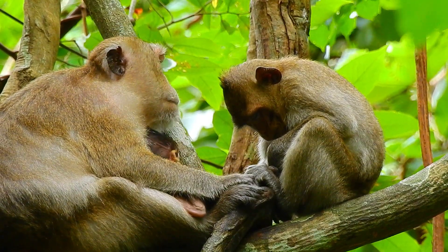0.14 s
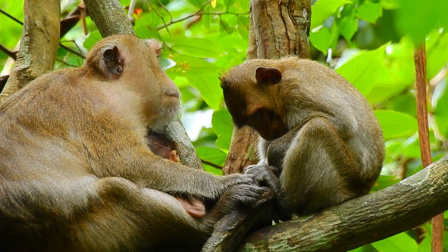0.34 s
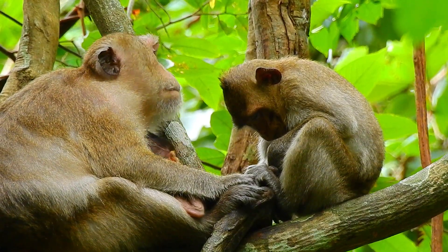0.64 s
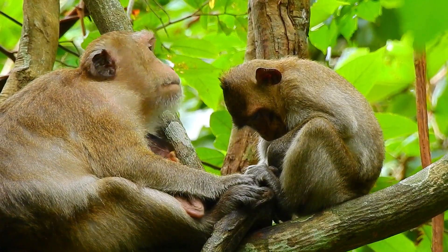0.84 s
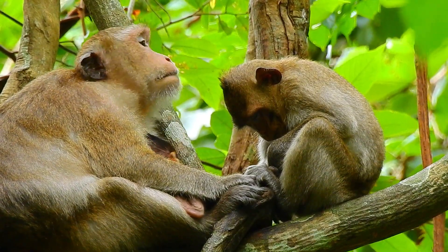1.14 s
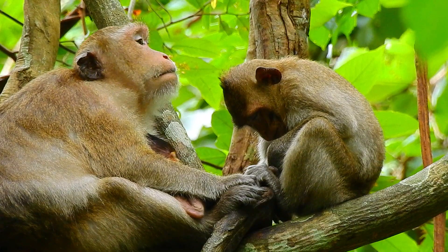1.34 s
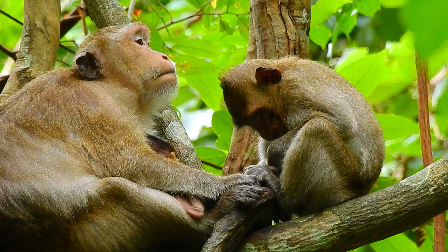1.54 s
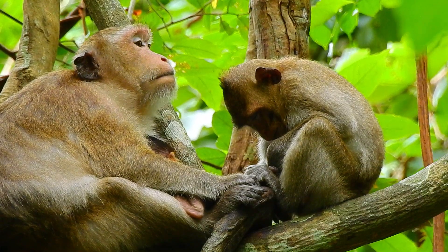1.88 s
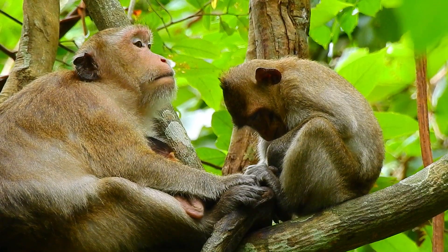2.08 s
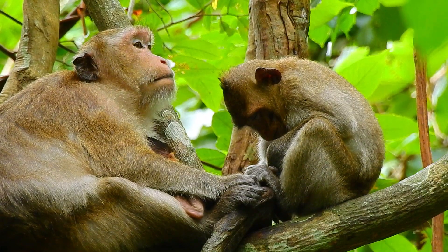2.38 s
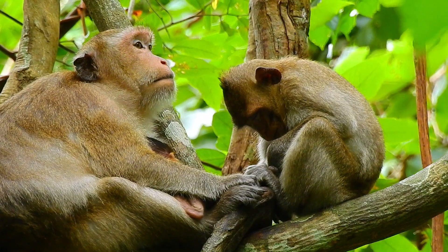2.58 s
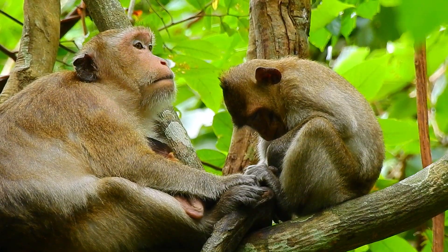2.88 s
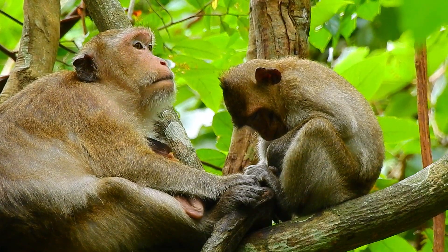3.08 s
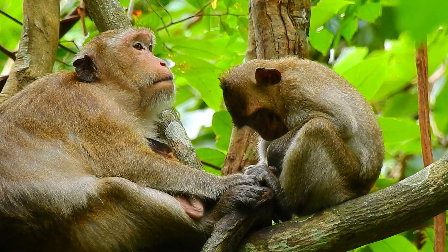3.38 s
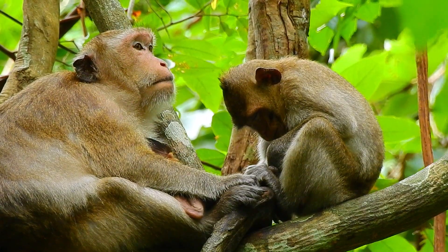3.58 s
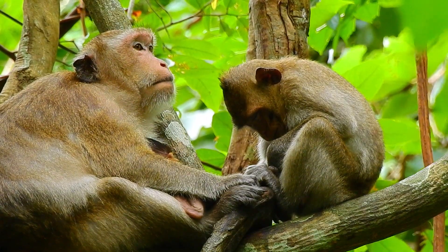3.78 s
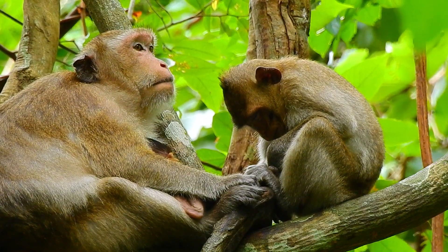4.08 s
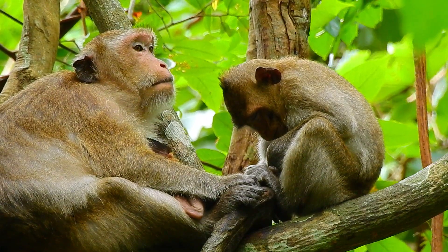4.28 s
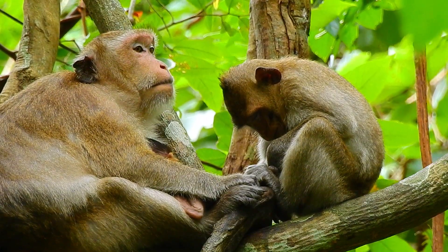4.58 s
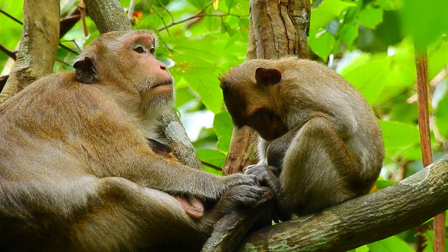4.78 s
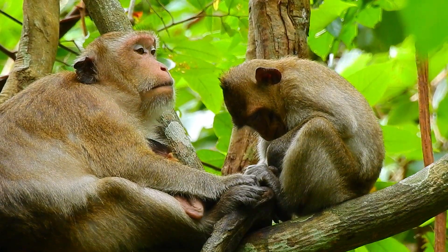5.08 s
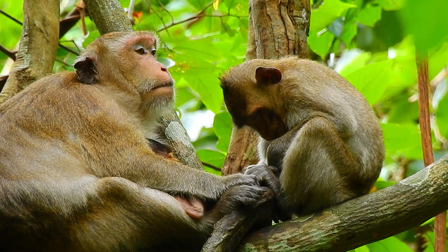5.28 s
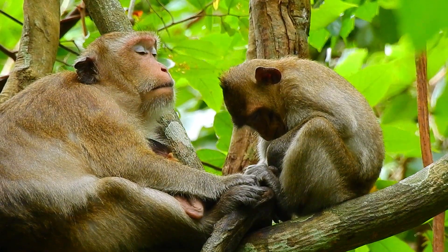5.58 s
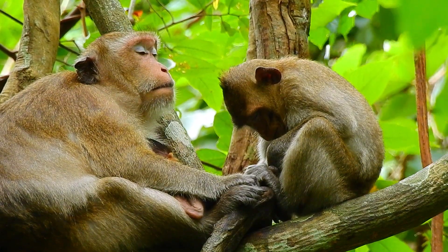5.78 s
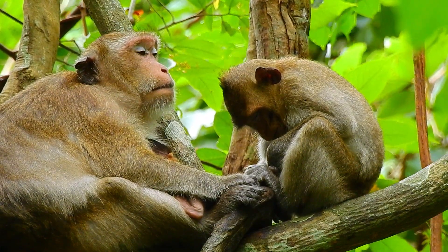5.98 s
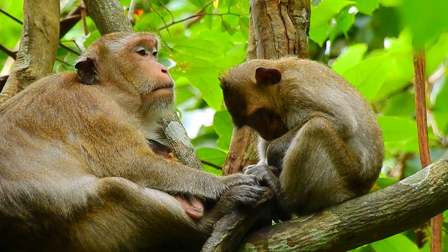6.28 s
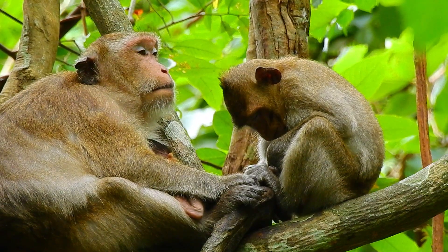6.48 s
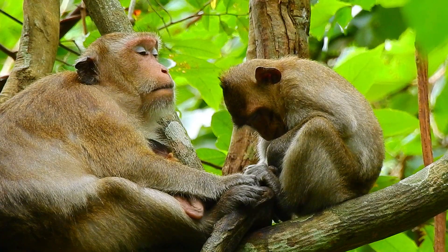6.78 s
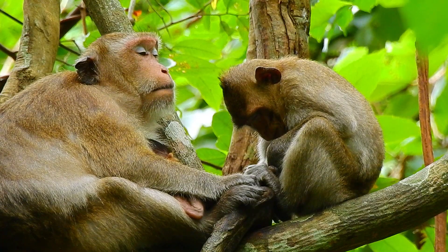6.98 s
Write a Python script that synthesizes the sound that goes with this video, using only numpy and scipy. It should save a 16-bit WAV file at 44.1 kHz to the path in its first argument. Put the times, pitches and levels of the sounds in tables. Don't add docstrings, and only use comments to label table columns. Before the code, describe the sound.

Forest edge by day, heard through an open stereo pair. Throughout, a thin steady insect drone near 5 kHz, cricket tone, soft canopy hiss and deep distant traffic rumble. From 0.1 to 0.6 s a near bird gives faint short upward whistles; from 0.8 to 2.2 s distant birds add glides and trilled falling notes, echoing among trunks. A cicada buzz swells from 1.5 s, is full by 2.2 and drops around 3.6. A quick near double note at 2.3, sharp chips at 2.5 and 2.8, and little dry leaf ticks follow. Around 3.3-3.8 s rapid glides twist up and down. From 4.1 to 5.4 s comes the loudest phrase: clear, mellow arched whistles around 1.1-2 kHz, with far replies, leaf rustle and two crisp ticks near 4.6. A few low notes fall at 5.6; then faint distant chirps, gently wavering insects and a weakening cricket until 7.1 s.

```python
import sys
import numpy as np
from scipy import signal
from scipy.fft import rfft, irfft, next_fast_len
from scipy.io import wavfile
from scipy.ndimage import uniform_filter1d

SR = 44100
rng = np.random.default_rng(int(sys.argv[2]) if len(sys.argv) > 2 else 0)


def invert_db(level):
    return 10 ** (np.asarray(level, dtype=float) / 20)


def generate_wav(sig):
    pcm = np.round(np.clip(np.atleast_2d(sig).T, -1, 1) * 32767).astype(np.int16)
    wavfile.write(sys.argv[1], SR, pcm)


N = 314874


def in_time(rows):
    s, *columns = np.transpose(rows)
    return [np.interp(np.arange(N) / SR, s, c) for c in columns]


def at_hz(points, hz):
    point_hz, value = np.transpose(points)
    return np.interp(np.log(hz), np.log(point_hz), value)


def drift(rate):
    r = np.exp(-80 * np.pi * rate / SR)
    slow = signal.lfilter([1], [1, -2 * r, r * r], rng.standard_normal(N // 40 + 2002))[2000:]
    return np.interp(np.arange(N) / 40, np.arange(len(slow)), slow / slow.std())


def stereo(mid, side, alike):
    c = np.clip(alike, 0, 1)
    return np.sqrt(1 + c) * mid + np.sqrt(1 - c) * side * [[1], [-1]]


def coloured(gain, alike, source=None):
    size = next_fast_len(N)
    hz = np.maximum(np.arange(size // 2 + 1) * SR / size, 1)
    pulsing = 1 if source is None else source
    mid, side = rfft(rng.standard_normal((2, N)) * pulsing, size)
    x = irfft(gain(hz) * stereo(mid, side, alike(hz)), size)[:, :N]
    return x / x.std()


def resonant(centre_hz, width_hz, alike, source=None):
    return coloured(lambda hz: 1 / (1 + (2 * (hz - centre_hz) / width_hz) ** 2),
                    lambda hz: alike + 0 * hz, source)


# (frequency [Hz], likeness [0-1])
OPEN_LIKENESS = [(30, 1), (150, 0.98), (300, 0.57), (1000, 0.22), (3000, 0.53), (6000, 0.21), (9000, 0.018),
                 (13000, 0.15)]


def open_likeness(hz):
    return at_hz(OPEN_LIKENESS, hz)


# (frequency [Hz], density [dB per Hz])
TRAFFIC_SPECTRUM = [(12, -54), (20, -38.5), (60, -1), (88, 1.5), (141, -3), (196, -12), (255, -23.5),
                    (400, -33), (520, -51), (880, -120)]
# (time [s], level [dB])
TRAFFIC_LEVEL = [(0, -35.5), (5.6, -36), (7.14, -36.5)]


def traffic():
    level_db, = in_time(TRAFFIC_LEVEL)
    rumble = coloured(lambda hz: invert_db(at_hz(TRAFFIC_SPECTRUM, hz)), open_likeness)
    return invert_db(level_db) * rumble * invert_db([[.2], [-.2]])


# (frequency [Hz], density [dB per Hz])
CANOPY_SPECTRUM = [(180, -33), (300, -8.5), (620, -7.5), (808, -11), (907, -11.5), (1870, -12.5),
                   (2790, -11), (3570, -14.5), (4420, -12), (4880, -2), (5390, -9), (8420, -16),
                   (9930, -22), (11100, -21.5), (15500, -32)]


def canopy():
    hiss = coloured(lambda hz: invert_db(at_hz(CANOPY_SPECTRUM, hz)), open_likeness)
    return invert_db(-48 + 0.6 * drift(18)) * hiss


def leaf_noise(out, s, shape, hz, width):
    band = signal.butter(3, [hz - width / 2, hz + width / 2], "band", fs=SR, output="sos")
    noise = rng.standard_normal((2, len(shape)))
    mid, side = signal.sosfilt(band, noise) * np.sqrt(SR / 4 / width)
    a = round(s * SR)
    out[:, a:a + len(shape)] += (shape * (mid + 0.67 * side * [[1], [-1]]))[:, :N - a]


# (time [s], peak level [dB], centre [Hz], width [Hz], fall by 60 dB [s])
TICKS = [
    (2.428, -42, 7000, 2970, 0.042),
    (2.739, -40, 6440, 2510, 0.025),
    (3.12, -39, 6870, 3010, 0.033),
    (3.461, -43, 6500, 2470, 0.04),
    (4.534, -33.5, 6540, 2480, 0.028),
    (4.711, -34, 6080, 2000, .025),
    (6.605, -51, 12300, 2530, 0.071),
]


def leaf_ticks():
    out, t = np.zeros((2, N)), np.arange(SR // 2) / SR
    for s, db, hz, width, t60 in TICKS:
        shape = invert_db(db + 4.5 - 60 * t / t60) * np.minimum(t / 0.0038, 1)
        leaf_noise(out, s, shape, hz, width)
    return out


# (time [s], length [s], centre [Hz], width [Hz], level [dB])
RUSTLES = [
    (3.971, 0.23, 6380, 1730, -43.5),
    (4.217, 0.39, 4400, 1550, -46.5),
    (4.295, 0.14, 2920, 500, -50),
    (4.294, 0.087, 10000, 906, -52.5),
    (4.524, 0.16, 9880, 890, -54),
    (5.356, 0.14, 10520, 1440, -64),
    (6.142, 0.095, 7120, 1557, -56),
]


def leaf_rustles():
    out, t, grains = np.zeros((2, N)), np.arange(SR // 2) / SR, drift(60)
    for s, length, hz, width, db in RUSTLES:
        clumps_db = 1.27 * grains[round(s * SR):][:len(t)]
        swell = 3 * t / length * np.exp(-3 * t / length)
        leaf_noise(out, s, invert_db(db + 9.0 + clumps_db) * swell, hz, width)
    return out


# (frequency [Hz], width [Hz], level [dB], likeness [0-1])
DRONES = [
    (4839, 135, -51.5, 0.65),
    (804, 103, -63.5, 0.94),
    (997, 46, -64.5, 0.93),
    (4048, 71, -65.5, 0.18),
    (10860, 110, -71, 0.11),
]


def drones():
    return sum(invert_db(db + 2.5 * drift(3.5)) * resonant(hz, width, alike) for hz, width, db, alike in DRONES)


# (multiple of its tone, width [Hz], level [dB], waver [dB], share of the tiring)
CRICKET = [
    (1, 50, -56, -0.8, 0.64),
    (2, 19, -57.5, 2.8, 0.18),
    (4, 76, -67.5, -0.5, 1.3),
]


def cricket():
    t = np.arange(N) / SR
    tired_db = 8.5 * np.maximum(t - 5.15, 0)
    out = 0
    for multiple, width, db, waver_db, share in CRICKET:
        level = invert_db(db + waver_db * drift(0.75) - share * tired_db)
        out = out + level * resonant(multiple * 2864, width, 0.33)
    return out


# (frequency [Hz], width [Hz], start [s], stop [s], level [dB])
KATYDIDS = [
    (7650, 70, 1.4, 4.7, -63),
    (8250, 363, 4, 7.3, -60),
]


def katydids():
    t = np.arange(N) / SR
    swell_db_per_s, fade_db_per_s, resting_db = 15, 44, -16
    out = 0
    for hz, width, start, stop, db in KATYDIDS:
        bout_db = np.minimum(swell_db_per_s * (t - start), fade_db_per_s * (stop - t))
        out = out + invert_db(db + np.clip(bout_db, resting_db, 0)) * resonant(hz, width, 0.25)
    return out


# (time [s], level [dB])
CICADA = [
    (0, -68),
    (1.45, -52.5),
    (1.52, -47),
    (2.15, -42.5),
    (3.47, -43.5),
    (3.7, -57.5),
    (5.3, -51.5),
    (5.85, -60),
    (6.6, -53.5),
    (7.14, -62),
]


def cicada():
    effort_db, = in_time(CICADA)
    line_db = effort_db - 9 + 0.6 * (effort_db - effort_db.max())
    beat_hz = 117 * (1 + 0.022 * drift(1.2))
    beat = np.sin(2 * np.pi * np.cumsum(beat_hz) / SR)
    buzz = invert_db(effort_db + 1.5) * resonant(5103, 640, 0.43, source=1 + 0.13 * beat)
    return buzz + invert_db(line_db) * resonant(5380, 44, 0.56)


def bird(notes, edge_s, waver_db, half_db=-90, trill_hz=0, trill_rate=0):
    pitch, gain = np.zeros(N), np.zeros(N)
    for s, length, start, middle, end, db in notes:
        a, b = round(s * SR), round((s + length) * SR)
        u = np.linspace(-1, 1, b - a)
        bend = (start + end) / 2 - middle
        pitch[a:b] = middle + (end - start) / 2 * u + bend * u ** 2
        gain[a:b] = invert_db(db) * np.sqrt(2)
    on = np.flatnonzero(pitch)
    pitch = np.interp(np.arange(N), on, pitch[on])
    pitch = pitch + trill_hz * np.sin(2 * np.pi * trill_rate * np.arange(N) / SR)
    edge = max(int(edge_s * SR), 1)
    gain = uniform_filter1d(uniform_filter1d(gain, edge), edge) * invert_db(waver_db * drift(68))
    phase = 2 * np.pi * np.cumsum(uniform_filter1d(pitch, edge)) / SR
    return gain * (np.sin(phase) + invert_db(half_db) * np.sin(phase / 2))


def glides(rows):
    return [(s, length, start, start + 0.63 * (end - start), end, db) for s, length, start, end, db in rows]


def among_trunks(x, echo_db, pan_db, build_s, alike):
    t = np.arange(int(1.2 * SR)) / SR
    mid, side = rng.standard_normal((2, 2, 1, len(t)))
    deep_wood = invert_db(-60 * t / 1.43)
    near_trunks = invert_db(6 - 60 * t / 0.45)
    scatter = stereo(mid, side, alike) * (deep_wood + near_trunks) * (1 - np.exp(-t / build_s))
    scatter = scatter / np.sqrt(np.sum(scatter ** 2) / 4)
    scatter = signal.sosfilt(signal.butter(2, 1750, "high", fs=SR, output="sos"), scatter)
    turn = 2 * np.pi * (0.8144 * np.arange(N) / SR + 0.13 * drift(4.4))
    sent = x * np.array([[np.cos(turn)], [np.sin(turn)]])
    wet = signal.fftconvolve(sent, scatter, axes=2).sum(axis=0)[:, :N]
    return (x + invert_db(echo_db) * wet) * invert_db(pan_db / 2 * np.array([[1], [-1]]))


# (time [s], length [s], start [Hz], end [Hz], level [dB])
TRILLS = [
    (.89, .079, 2550, 2290, -50.5),
    (1.43, .2, 2600, 2243, -54),
    (1.77, .036, 3150, 3594, -56.5),
    (1.965, .067, 2470, 2387, -44),
    (2.035, .19, 2450, 2130, -41.5),
    (4.21, .08, 2520, 2190, -46),
    (5.68, .1, 2280, 2660, -60),
    (6.04, .088, 2250, 2740, -57.5),
    (6.14, .073, 3050, 1950, -55.5),
]


def trilling_bird():
    return bird(glides(TRILLS), 0.00044, 0.5, trill_hz=222, trill_rate=32)


# (time [s], length [s], start [Hz], end [Hz], level [dB])
ASIDE = [
    (1.025, .18, 2482, 2476, -48.5),
    (1.458, 0.14, 1959, 1897, -40.5),
    (4.015, 0.029, 2075, 2089, -41),
    (4.478, .016, 2180, 2134, -46),
    (4.53, 0.048, 2155, 2055, -38.5),
    (4.77, .02, 2050, 2046, -49),
    (6.06, 0.092, 2182, 2450, -56.5),
    (6.5, .14, 2300, 2200, -66),
    (6.94, .06, 2700, 2700, -65),
]


def aside_notes():
    return bird(glides(ASIDE), 0.0024, 1.9)


# (time [s], valley of the second partial [Hz], level [dB], valley length [s], flick [dB])
CHIPS = [
    (2.5, 3060, -48, 0.022, 3.5),
    (2.79, 3070, -42.5, 0.028, -15),
]


def chipping_bird():
    drop_s, flick_s, flick = 0.01325, 0.018, 1.16
    notes = []
    for s, hz, db, valley, flick_db in CHIPS:
        bottom = s + drop_s
        notes += glides([(s, drop_s, 1.22 * hz, hz, db + 2.5),
                         (bottom, valley, .98 * hz, 1.02 * hz, db)])
        notes += [(bottom + valley, flick_s, 1.02 * hz, (1.02 + flick) / 2 * hz, flick * hz, db + flick_db)]
    return bird(notes, 0.0033, 2.6, half_db=-12.5)


# (time [s], length [s], pitch [Hz], level
# [dB])
HELD = [(1.154, 0.025, 3102, -62.5), (3.85, 0.055, 2045, -45), (3.948, 0.015, 2024, -37.5),
        (3.979, 0.014, 2075, -38.5), (4.033, 0.038, 2646, -44.5), (4.11, .1, 2660, -53),
        (4.433, .036, 3207, -42.5), (4.816, 0.031, 3021, -32), (5.564, 0.0296, 965, -44.5),
        (5.605, .045, 888, -52), (6.039, 0.042, 1980, -55), (6.28, .05, 2720, -71), (6.504, .04, 2553, -60),
        (6.561, .025, 2550, -56), (6.612, .03, 2510, -60.5)]
# (time [s], length [s], start [Hz], end [Hz], level
# [dB])
FAR_GLIDES = [(.808, 0.053, 3220, 2930, -54), (.853, 0.08, 2785, 2663, -47),
              (1.745, 0.023, 2923, 2674, -45), (1.775, 0.045, 2703, 2900, -45.5),
              (3.05, 0.02, 3060, 2900, -43), (3.072, .017, 2990, 3333, -48),
              (3.09, 0.039, 3040, 2880, -46.5), (3.49, 0.137, 2065, 2267, -44),
              (4.462, 0.019, 3140, 2830, -39.5), (4.84, 0.02, 2900, 2548, -39),
              (5.52, 0.0336, 824, 940, -51), (5.9, .125, 2072, 2180, -59.5), (6.235, .04, 3326, 2700, -59),
              (.985, .035, 2438, 2470, -47), (6.36, 0.05, 2497, 2395, -59)]


def far_whistlers():
    held = [(s, length, hz, hz, hz, db) for s, length, hz, db in HELD]
    return bird(held + glides(FAR_GLIDES), 0.003, 4.8)


def far_birds():
    song = far_whistlers() + chipping_bird() + aside_notes() + trilling_bird()
    return among_trunks(song, echo_db=5.0, pan_db=1.5, build_s=0.00084, alike=0.79)


def arches(rows, climb_hz_per_s, hold_s, hold_per_fall, floor_hz, rise_db, fall_db, round_hz_per_s=0):
    notes = []
    for s, crest, db, rise, fall in rows:
        up, down = crest * (1 - .06), crest * (1 - .035)
        hold = hold_s + hold_per_fall * fall
        climb = climb_hz_per_s * rise
        halfway = (down + floor_hz) / 2 - round_hz_per_s * max(fall - .025, 0)
        notes += [(s - rise, rise, up - climb, up - climb / 2, up, db + rise_db),
                  (s, hold, up, crest, down, db),
                  (s + hold, fall, down, halfway, floor_hz, db + fall_db)]
    return notes


# (crest time [s], crest [Hz], level [dB], rise [s], fall [s])
CRESTS = [
    (4.645, 1904, -32.5, 0.014, 0.0226),
    (4.897, 1960, -32, .024, 0.017),
]
SLURS = [
    (.442, 1930, -45.5, 0.017, 0),
    (.582, 1924, -43.5, .026, 0.0015),
]
DIVES = [
    (4.517, 2019, -34.5, .03, .044),
    (5.135, 1988, -31, .02, 0.027),
    (5.348, 1822, -30, .028, .019),
]
CLIMBS = [
    (.122, 1607, -48.5, 0.048, 0.0053),
    (4.096, 1600, -28, 0.024, 0.017),
    (4.288, 1552, -28.5, .048, .05),
]
# (time [s], length [s], start [Hz], end [Hz], level [dB])
NEAR_GLIDES = [(1.318, 0.047, 1286, 1140, -46.5), (1.425, .016, 1786, 1735, -49),
               (1.52, 0.032, 1150, 1323, -53), (1.575, 0.01, 1510, 1470, -41),
               (1.745, 0.036, 1500, 1420, -54), (2.326, 0.0155, 1707, 1158, -37.5),
               (2.343, 0.032, 1170, 1110, -37.5), (2.505, 0.019, 1696, 1500, -46),
               (2.525, 0.03, 1548, 1843, -49), (3.052, .03, 1541, 1480, -53.5),
               (3.315, 0.029, 2140, 1850, -47.5), (3.39, .014, 1904, 1650, -42),
               (3.41, 0.019, 1950, 2080, -38.5), (3.432, .011, 2310, 2570, -40),
               (3.443, .011, 2650, 3380, -48), (3.455, .032, 3390, 2860, -37.5),
               (3.58, .042, 2050, 1730, -43.5), (3.626, .052, 1738, 1975, -44.5),
               (3.69, 0.024, 2570, 2436, -35.5), (3.72, .035, 2420, 2086, -39.5),
               (3.755, .028, 2185, 2530, -43), (4.597, 0.024, 1017, 1435, -46),
               (5.622, 0.0224, 1624, 1830, -47), (5.648, 0.016, 1460, 1197, -45)]


def near_whistler():
    song = arches(CRESTS, climb_hz_per_s=18000, hold_s=0.027, hold_per_fall=0.013, floor_hz=1310,
                  rise_db=-5, fall_db=-7.5)
    song += arches(SLURS, climb_hz_per_s=25000, hold_s=.03, hold_per_fall=0, floor_hz=0,
                   rise_db=-6, fall_db=0)
    song += arches(DIVES, climb_hz_per_s=15000, hold_s=0.000966, hold_per_fall=0.64, floor_hz=1088.5,
                   rise_db=-8, fall_db=-2.7, round_hz_per_s=7590)
    song += arches(CLIMBS, climb_hz_per_s=4500, hold_s=0.00856, hold_per_fall=0.085, floor_hz=1130,
                   rise_db=-8.5, fall_db=-4.2)
    voice = bird(song + glides(NEAR_GLIDES), 0.0057, 0.28)
    return among_trunks(voice, echo_db=3.5, pan_db=2.0, build_s=0.002, alike=0.83)


def scene():
    background = traffic() + canopy()
    leaves = leaf_ticks() + leaf_rustles()
    insects = (drones() + cricket() + katydids() + cicada()) * invert_db([[.4], [-.4]])
    return background + leaves + insects + far_birds() + near_whistler()


def top_cut(x):
    return signal.sosfilt(signal.butter(12, 15660, fs=SR, output="sos"), x)


def record(dry):
    return top_cut(dry)


dry = scene()
out = record(dry)
generate_wav(out)
```